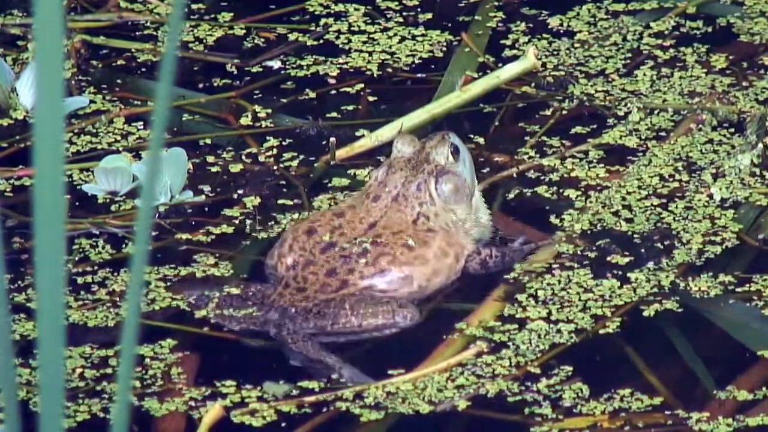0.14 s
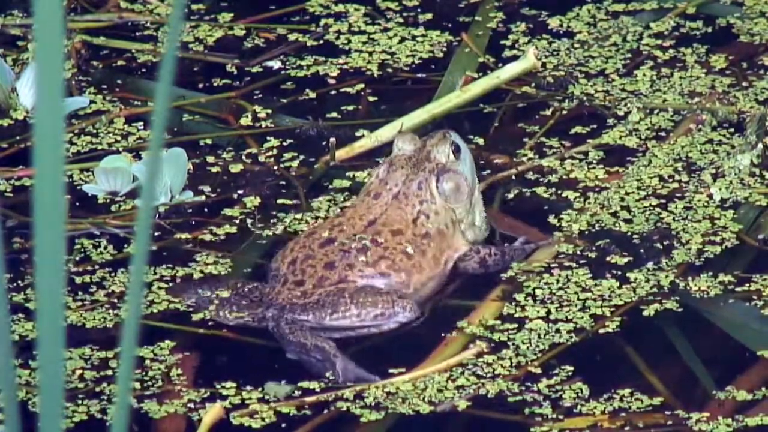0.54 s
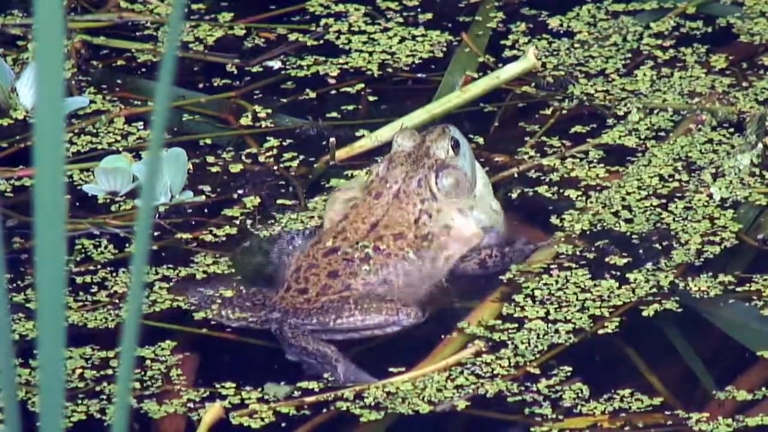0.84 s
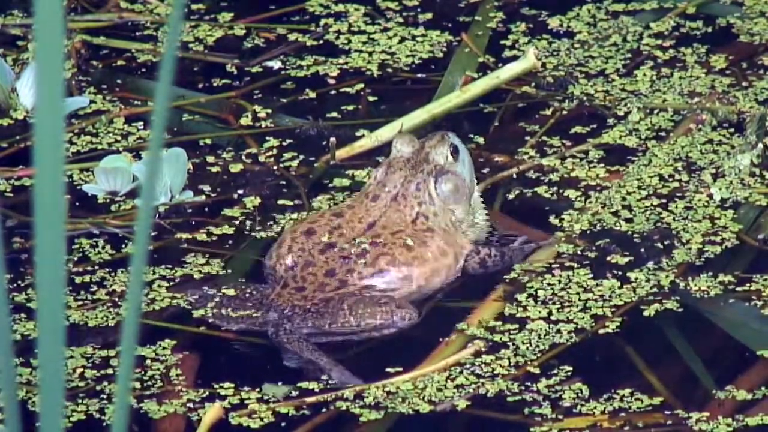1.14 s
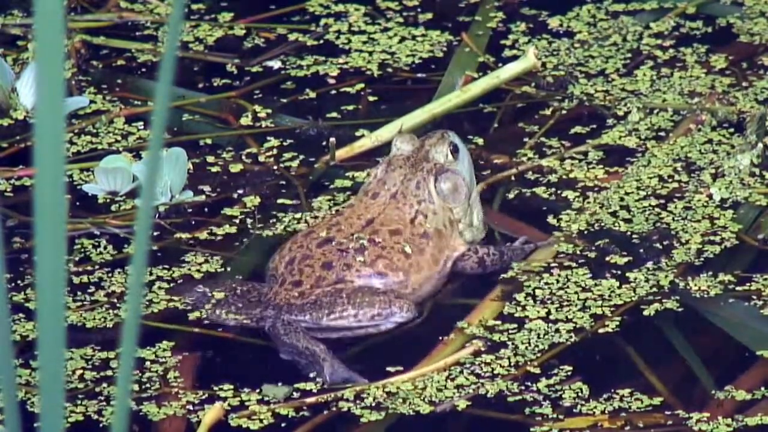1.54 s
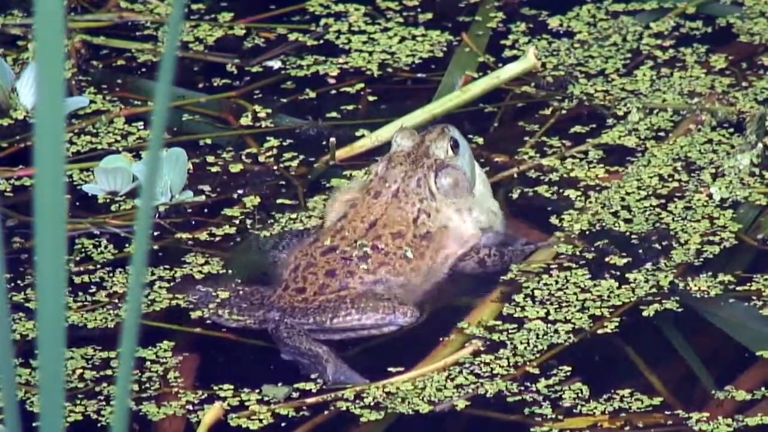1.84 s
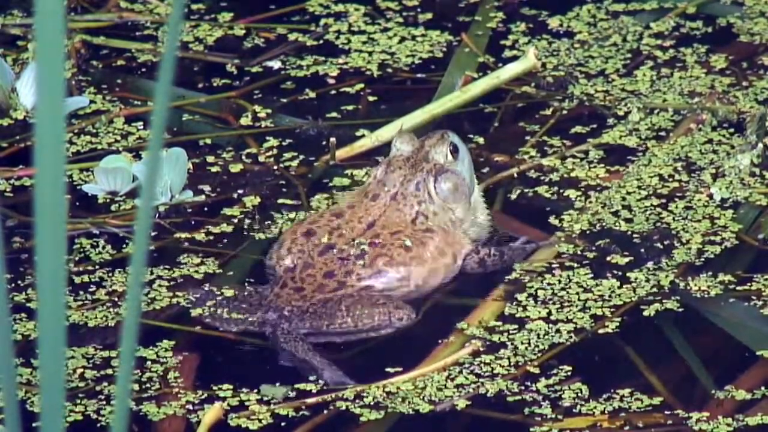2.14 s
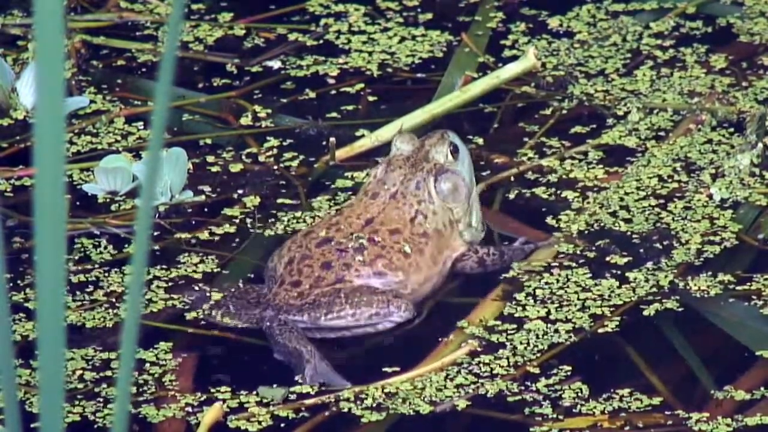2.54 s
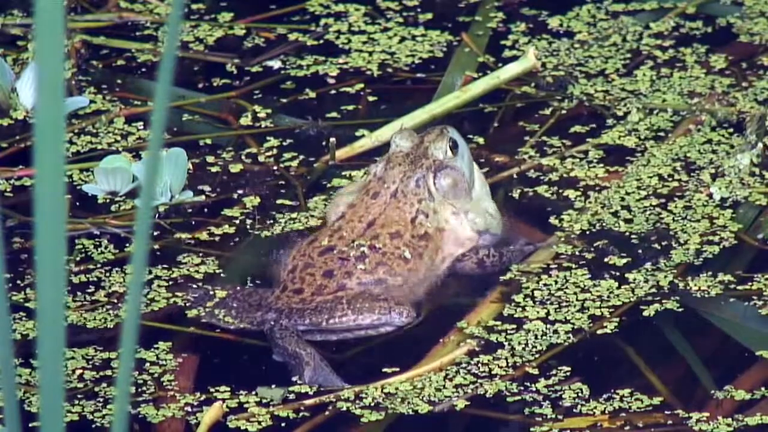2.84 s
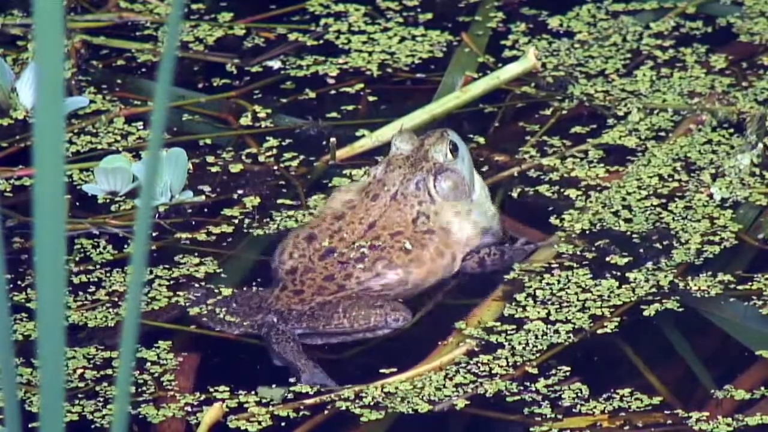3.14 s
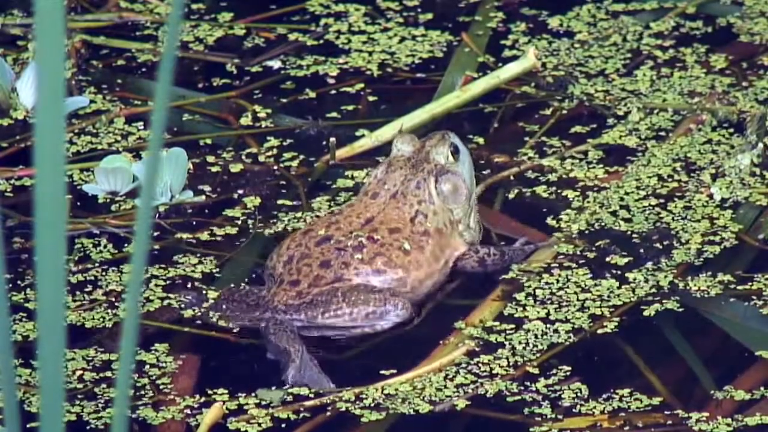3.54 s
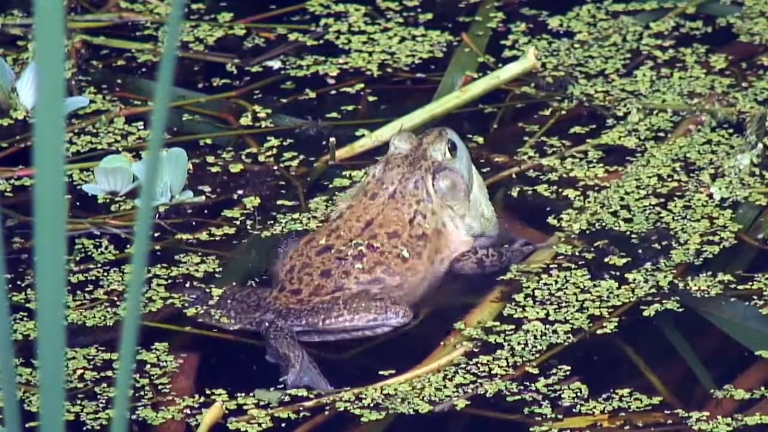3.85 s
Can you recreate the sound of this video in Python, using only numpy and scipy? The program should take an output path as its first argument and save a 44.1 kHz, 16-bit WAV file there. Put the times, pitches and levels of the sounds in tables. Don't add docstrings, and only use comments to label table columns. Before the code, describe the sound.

A bullfrog close to the microphone gives four low, buzzing croaks about a second apart, each slightly stronger, outdoors at a pond; distant engines drone, insects hiss, and a faint cicada joins on the left.

```python
import sys
import numpy as np
from scipy import signal
from scipy.fft import rfft, irfft
from scipy.io import wavfile
from scipy.ndimage import uniform_filter1d

SR = 44100
rng = np.random.default_rng(int(sys.argv[2]) if len(sys.argv) > 2 else 0)


def makeup_ratio(level_db):
    decades = np.asarray(level_db, float) / 20
    return 10 ** decades


def pcm_store(signal):
    levels = np.round(np.clip(np.atleast_2d(signal), -1, 1) * 32767)
    wavfile.write(sys.argv[1], SR, levels.astype(np.int16).T)


N = 176400
T = np.arange(N) / SR


def evened(x):
    return x / np.sqrt(np.mean(x ** 2) + 1e-20)


def read(points, hz):
    f, value = np.transpose(points)
    return np.interp(np.log(hz + 1), np.log(f + 1), value)


def slow(rate, n=N):
    size = int(SR / rate)
    return evened(uniform_filter1d(uniform_filter1d(rng.standard_normal(n), size), size))


def resonate(x, hz, width):
    turn = np.exp(2j * np.pi * np.cumsum(hz * np.ones(len(x))) / SR)
    r = np.exp(-np.pi * width / SR)
    return 2 * (turn * signal.lfilter([1 - r], [1, -r], x / turn + 1e-18)).real


def twice(x, hz, width):
    return resonate(resonate(x, hz, width), hz, width)


def colour(x, points):
    hz = np.fft.rfftfreq(N, 1 / SR)
    return irfft(rfft(x) * makeup_ratio(read(points, hz)), N)


def hiss(points, same, patchy_db):
    frames, hz = N // 256 + 5, np.fft.rfftfreq(1024, 1 / SR)
    a, b, c, d, patches = rng.standard_normal((frames, 513, 5)).T
    patches = uniform_filter1d(uniform_filter1d(patches, size=10, axis=0), size=12, axis=1)
    same = np.clip(read(same, hz), -1, 1)[:, None]
    left = a + 1j * b
    right = same * left + np.sqrt(1 - same ** 2) * (c + 1j * d)
    level_db = read(points, hz)[:, None] + patchy_db * evened(patches)
    z = np.array([left, right]) * makeup_ratio(level_db)
    return signal.istft(z, nperseg=1024, noverlap=768)[1][:, :N]


# (f/Hz, level/dB per Hz)
AIR = [(25, -9), (80, -1.5), (330, -2), (560, -13), (1100, -9), (2300, -23), (4300, -27), (5000, -31.5),
       (7500, -34)]
# (f/Hz, likeness 0-1)
AIR_LIKENESS = [(60, 0.59), (130, 0.87), (260, 0.48), (950, 0.87), (3770, 0.49), (15000, .05)]


def open_air():
    return makeup_ratio(-38) * evened(hiss(AIR, AIR_LIKENESS, patchy_db=1.5))


# (shaft order, level/dB)
STEADY_ORDERS = [(1, -40), (2, -38), (5, -45.5), (6, -66), (7, -48.5), (8, -56), (9, -59.5)]
# (t/s, second order f/Hz, load level/dB)
LABOUR = [(0, 96, 0), (.4, 96.5, 0), (1.8, 96.8, 2), (2.05, 91, -1.5), (2.3, 84, -1), (2.6, 81.5, -4),
          (3.0, 84, -3), (3.25, 86, 1), (3.5, 90, -1), (4, 93.5, 0.5)]
# (shaft order, level/dB, start/turns)
LABOUR_ORDERS = [(1, -45, 0.56), (2, -37.5, 0.041), (3, -82, 0.25), (5, -48, 0.46)]
# (start t/s, end t/s, start f/Hz, end f/Hz, level/dB)
WHINES = [
    (.03, .2, 960, 920, -56),
    (.11, .38, 1380, 1240, -58),
]


def engines():
    steady_hz, in_step_s, waver_db = 52.08, .345, 1.03
    steady = steady_hz * (T - in_step_s)
    t, second_order_hz, load_db = np.transpose(LABOUR)
    labour = np.cumsum(np.interp(T, t, second_order_hz) / 2) / SR
    labour = labour - labour[round(in_step_s * SR)]
    load_db = np.interp(T, t, load_db)
    out = makeup_ratio(-52 + 3.5 * slow(3)) * np.sin(2 * np.pi * 60 * T)
    for k, db in STEADY_ORDERS:
        level = makeup_ratio(db + waver_db * (0.5 + 0.39 * k) * slow(7.1))
        out = out + level * np.cos(2 * np.pi * k * steady)
    for k, db, start in LABOUR_ORDERS:
        level = makeup_ratio(db + load_db + waver_db * slow(2.5))
        out = out + level * np.cos(2 * np.pi * (k * labour + start))
    for start, end, hz0, hz1, db in WHINES:
        u = np.clip((T - start) / (end - start), 0, 1)
        level = makeup_ratio(db + 4 * slow(25)) * np.sin(np.pi * u) ** 0.12
        out = out + level * np.sin(2 * np.pi * np.cumsum(hz0 + (hz1 - hz0) * u) / SR)
    return np.sqrt(2) * out * makeup_ratio([[-.6], [.6]])


# (f/Hz, level/dB per Hz)
CHORUS = [(3530, -107), (6000, -16.5), (7520, -8.5), (9090, 0.5), (9690, 2.5), (10600, 0.5), (12200, -13),
          (13800, -19), (15400, -41)]


def insect_chorus():
    return makeup_ratio(-40.5) * evened(hiss(CHORUS, [(6000, 0.041), (15000, 0.065)], patchy_db=1.7))


# (f/Hz, level/dB per Hz)
CICADA = [(2650, -59), (4500, -72), (5530, -32), (6290, -20), (8670, 1), (9810, 2), (12600, -9.5),
          (14500, -18), (15400, -41)]
# (f/Hz, width f/Hz, level/dB)
TYMBAL = [(9140, 60, -22), (9640, 390, -11), (10350, 120, -13), (11000, 68, -18.5)]
# (t/s, level/dB)
CICADA_LEVEL = [(1.475, -72), (1.495, -39.5), (2.0, -35.5), (2.3, -33), (4, -30.5)]


def cicada():
    ticks_per_s, throb_hz, throb_peak_s, throb_db = 9000, 25.9, 2.0, 2.3
    pan_db, likeness = 7.5, 0.12
    chance, sign, size = rng.random((3, 2, N))
    ticks = (chance < ticks_per_s / SR) * np.sign(sign - .5) * makeup_ratio(-1.3 * np.log(size + 1e-9))
    rung = []
    for x in ticks:
        ringing = sum(makeup_ratio(db) * evened(resonate(x, hz, width)) for hz, width, db in TYMBAL)
        rung.append(evened(colour(x, CICADA)) + ringing)
    left, other = rung
    right = likeness * np.roll(left, 2) + np.sqrt(1 - likeness ** 2) * other
    throb = throb_db * np.cos(2 * np.pi * throb_hz * (T - throb_peak_s)) * makeup_ratio(0.74 * slow(3.8))
    throb = throb + 0.45 * slow(31.4)
    level = np.interp(T, *np.transpose(CICADA_LEVEL), left=-120)
    return np.array([left, right]) * makeup_ratio(level + throb) * makeup_ratio([[pan_db * 0.46], [-pan_db * 0.39]])


def pond(x):
    t60_s, level_db, brightness, low_hz = 0.16, -3.5, 0.7, 450
    taps = np.zeros((2, 9000))
    at = np.arange(60, 8980, 20) + rng.integers(0, 20, (2, 446))
    np.put_along_axis(taps, at, rng.choice([-1., 1.], at.shape), 1)
    taps = taps * makeup_ratio(-60 * np.arange(taps.shape[1]) / SR / t60_s)
    taps = signal.lfilter([1, -brightness], [1], taps)
    taps = signal.lfilter(*signal.butter(2, low_hz, "high", fs=SR), taps)
    return makeup_ratio(level_db) * signal.fftconvolve(x[None], taps / np.linalg.norm(taps[0]), axes=1)[:, :N]


# (start f/Hz, end f/Hz, width f/Hz, level/dB)
WHISTLES = [(6300, 5100, 190, -29.5), (5750, 4620, 190, -30), (6600, 5800, 600, -31),
            (7600, 7200, 1300, -28.5)]


def nostril_whistles(turns, done):
    n = len(turns)
    out = 0
    for hz0, hz1, width, db in WHISTLES:
        level = makeup_ratio(db + 4.6 * slow(2.2, n))
        puffs = np.exp(-(turns % 1) / 0.5) * rng.standard_normal(n)
        out = out + level * evened(twice(puffs, hz0 + (hz1 - hz0) * done, width))
    return out


# (multiple of click rate, level/dB, gain over the croak/dB)
SAC = [(2, -2, 1), (3, -18, 15.5), (4, -34, 25.5), (5, -51.5, -34.5), (6, -28, 9)]


def sac_hum(t, end, done, opened, even, skips, slips, rel_db, loss_db, surge):
    n = len(t)
    fall = 50 * t
    ring_db = np.maximum.accumulate(rel_db + fall) - fall
    ring_db = np.minimum(ring_db, (end + 0.069 - t) * 900 - 4)
    ring_db = uniform_filter1d(ring_db, size=400)
    lag_turns = .087 + .078 * np.clip(3 * done, 0, 1)
    hum = 0
    for k, db, gain in SAC:
        level = makeup_ratio(db + gain * opened + 0.068 * k * np.maximum(rel_db, -25))
        short_way = (k * skips + .35) % 1 - .35
        place = k * (even - lag_turns) + short_way @ slips
        hum = hum + level * np.sqrt(2) * np.cos(2 * np.pi * place)
    fuzz = evened(twice(rng.standard_normal(n), 300, 198))
    hum = makeup_ratio(loss_db + 2.5 * surge + 1.0 * slow(31, n)) * hum
    return makeup_ratio(FULL_DB + ring_db) * (hum + makeup_ratio(-13) * fuzz)


# (t/s, skip/turns)
SKIPS = [(0.445, 0.58), (0.548, 0.36), (0.655, 0.18), (1.445, -0.17), (1.557, 0.71), (1.68, 0.09),
         (1.795, 0.0), (2.462, 0.11), (2.578, 0.72), (2.7, 0.1), (2.83, 0.09), (3.565, 0.22), (3.67, 0.22),
         (3.8, 0.04)]


def vocal_cords(t, start, end, pitch, first_turns):
    slip_s = .004
    even = first_turns + np.cumsum(np.interp(t, *np.transpose(pitch))) / SR
    when, skips = np.array([row for row in SKIPS if start < row[0] < end]).T
    slips = 1 / (1 + np.exp(-np.clip((t - when[:, None]) / slip_s, -50, 50)))
    return even, skips, slips


# (t/s, loss level/dB)
CATCHES = [(.456, -19), (0.552, -3.5), (0.66, 1.5), (1.456, -25.5), (1.566, -5), (1.689, -4), (1.801, 1),
           (2.475, -14), (2.585, 2), (2.71, -4), (2.835, -3.5), (3.574, -2), (3.68, 0.5), (3.812, -6)]


def voice_catches(t):
    catch_s, surge_lead_s, surge_s = 0.011, .022, .016
    loss_db, surge = np.zeros(len(t)), np.zeros(len(t))
    for at, db in CATCHES:
        loss_db = loss_db + db * np.exp(-((t - at) / catch_s) ** 2)
        surge = surge - db / 12 * np.exp(-((t - at + surge_lead_s) / surge_s) ** 2)
    return loss_db, surge


# (place in cycle 0-1, level/dB, scatter/dB)
ECHO_CLICKS = [
    (.345, -8.5, 3.2),
    (.67, -9, 3.8),
]


def cord_clicks(t, end, turns, thick_db):
    n = len(t)
    draws, clicks = rng.standard_normal((3, 100, 2)), np.zeros((3, n))
    for k, (place, level_db, scatter_db) in enumerate([(0.0033, 0, 1.5)] + ECHO_CLICKS):
        at = np.flatnonzero(np.diff(np.floor(turns - place)) > 0)
        early, strong = draws[k, :len(at)].T
        jitter = .02 if k else .006
        shift = (jitter * SR / 100 * early).astype(int)
        click_db = level_db + scatter_db * strong + (k > 0) * thick_db[at]
        clicks[k, np.clip(at + shift, 0, n - 1)] += makeup_ratio(click_db)
    soft = uniform_filter1d(clicks[1] + clicks[2], size=round(.0001 * SR))
    over_db = 500 * np.clip(t - end, 0, .03)
    clicks = (clicks[0] + soft) * makeup_ratio(-over_db)
    gate = 2.2 + np.exp(-(turns % 1) / 1.9)
    rasp = evened(gate * rng.standard_normal(n))
    return evened(clicks) + makeup_ratio(-15.5 + thick_db + 1.1 * over_db) * rasp


# (start f/Hz, end f/Hz, width f/Hz, level/dB, gain over the croak/dB)
THROAT = [(1156, 1255, 246, 9.5, -9), (1340, 1754, 660, -1, 4), (1900, 2407, 662, -5.5, 2),
          (2680, 3510, 814, -15.5, 7), (3600, 4400, 200, -29, 15), (710, 1010, 1010, -11.5, 2)]


def throat_ring(drive, opened, rel_db):
    throat = 0
    for k, (hz0, hz1, width, db, gain) in enumerate(THROAT):
        ring = twice(drive, hz0 + (hz1 - hz0) * opened, width)
        throat = throat + (-1) ** k * makeup_ratio(db + gain * opened) * ring
    band = signal.butter(2, [480, 9000], "bandpass", fs=SR, output="sos")
    throat = signal.sosfilt(band, throat)
    return throat / np.sqrt(np.mean((throat * makeup_ratio(rel_db)) ** 2) / np.mean(makeup_ratio(rel_db) ** 2))


FULL_DB = -17.5
# (share of the croak, effort level/dB)
SWELL = [(-.04, -63), (.0, -24.5), (.035, -16), (.07, -12), (0.249, -7), (.45, -3), (.75, -0.5),
         (.93, -2.5), (1.001, -7.5)]
# (t/s after the end, effort level/dB)
RELEASE = [(.03, -20), (.07, -29), (.1, -38), (.14, -60)]


def croak(start, end, strength_db, pitch, first_turns):
    t = pitch[0][0] + np.arange(SR * 3 // 4) / SR
    done = (t - start) / (end - start)
    opened = np.clip(done, 0, 1) ** .6
    shape = [(start + u * (end - start), db) for u, db in SWELL]
    shape = shape + [(end + s, db) for s, db in RELEASE]
    rel_db = strength_db + np.interp(t, *np.transpose(shape))
    even, skips, slips = vocal_cords(t, start, end, pitch, first_turns)
    turns = even + skips @ slips
    loss_db, surge = voice_catches(t)
    thick_db = 6 * surge - 8 * np.clip(1 - 2 * done, 0, 1)
    drive = cord_clicks(t, end, turns, thick_db)
    throat = throat_ring(drive, opened, rel_db)
    sac = sac_hum(t, end, done, opened, even, skips, slips, rel_db, loss_db, surge)
    air = nostril_whistles(turns, done) * makeup_ratio(0.4 * rel_db) * np.clip(2.7 * done - .5, 0, 1)
    return t[0], makeup_ratio(FULL_DB + rel_db + .4 * loss_db) * (throat + air) + sac


# (start t/s, end t/s, strength level/dB)
CROAKS = [
    (0.392, 0.923, 1),
    (1.393, 1.936, 1.5),
    (2.406, 2.988, 2.5),
    (3.484, 4.049, 3),
]
# (t/s, click rate f/Hz)
PITCH = [
    [(0.366, 95.78), (0.504, 97.5), (0.642, 99.58), (0.78, 102.32), (0.918, 106.83), (0.97, 101), (1.0, 96)],
    [(1.356, 93.95), (1.503, 96.7), (1.65, 100.24), (1.798, 104.28), (1.945, 108.42), (1.988, 102),
     (2.03, 100)],
    [(2.379, 96.86), (2.53, 98.28), (2.682, 100.75), (2.834, 104.8), (2.985, 110.03), (3.03, 102),
     (3.07, 95.6)],
    [(3.459, 94.74), (3.594, 97.84), (3.729, 101.04), (3.863, 104.69), (3.998, 111.26)],
]
START_TURNS = [0.3, 0.67, 0.17, 0.1]


def bullfrog():
    frog = np.zeros(N)
    for row, pitch, first_turns in zip(CROAKS, PITCH, START_TURNS):
        begin, sound = croak(*row, pitch, first_turns)
        part = frog[round(begin * SR):][:len(sound)]
        part += sound[:len(part)]
    return frog


def scene():
    frog = bullfrog()
    spread = makeup_ratio(-12) * np.roll(twice(frog, 315, 150), 35) * [[1], [-1]]
    near = frog * makeup_ratio([[-.1], [.1]]) + spread + pond(frog)
    return near + open_air() + insect_chorus() + engines() + cicada()


def roll_off(x):
    return signal.sosfilt(signal.butter(12, 15350, fs=SR, output="sos"), x)


def record(dry):
    limited = 1.3 * np.tanh(dry / 1.3)
    return roll_off(limited)


dry = scene()
out = record(dry)
pcm_store(out)
```